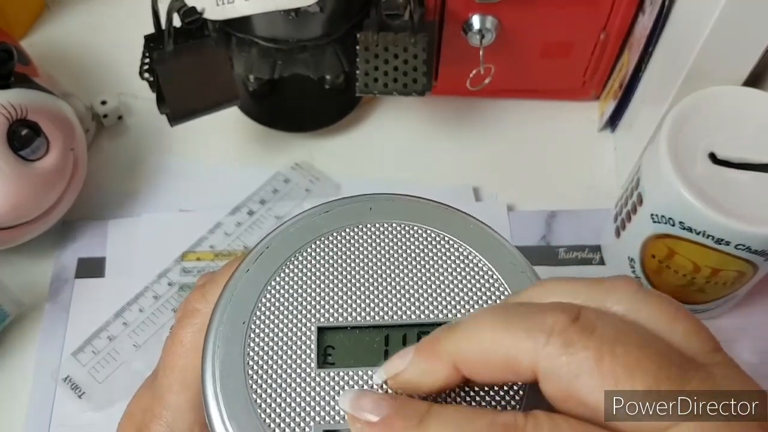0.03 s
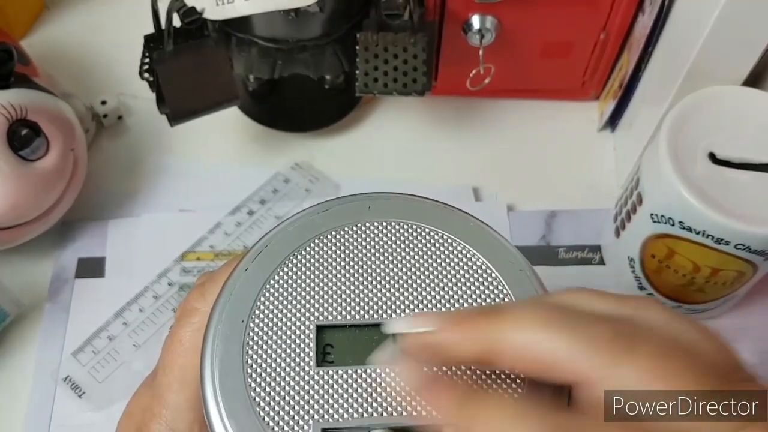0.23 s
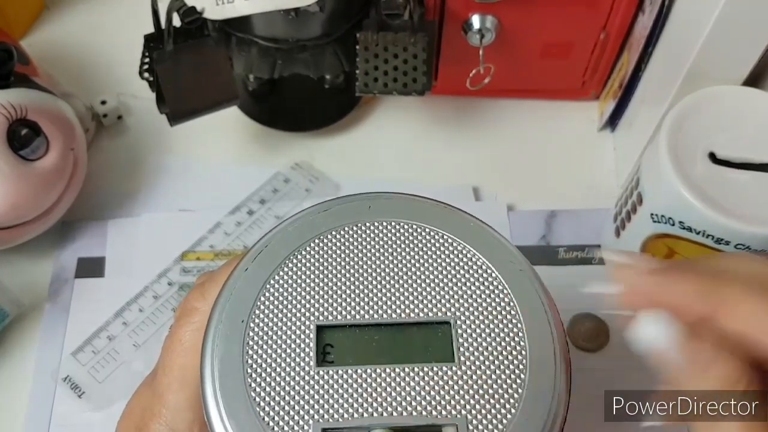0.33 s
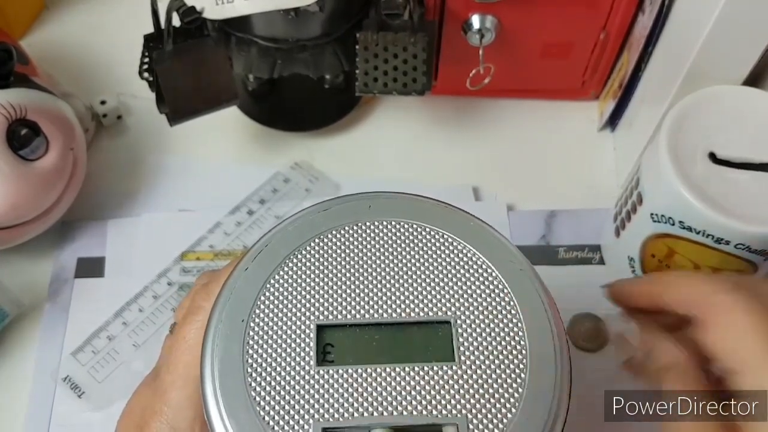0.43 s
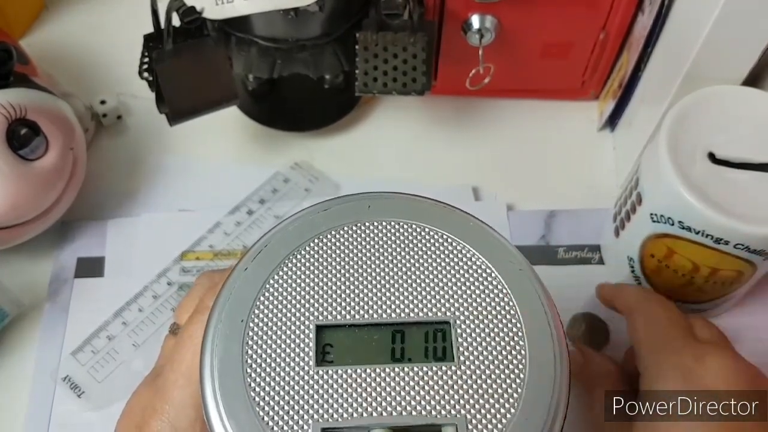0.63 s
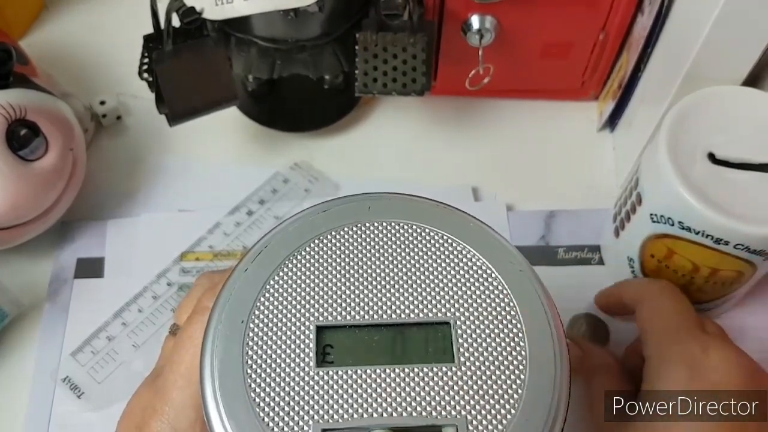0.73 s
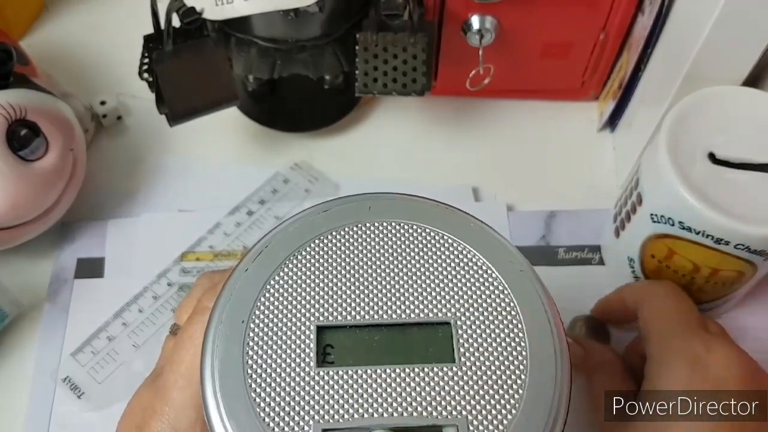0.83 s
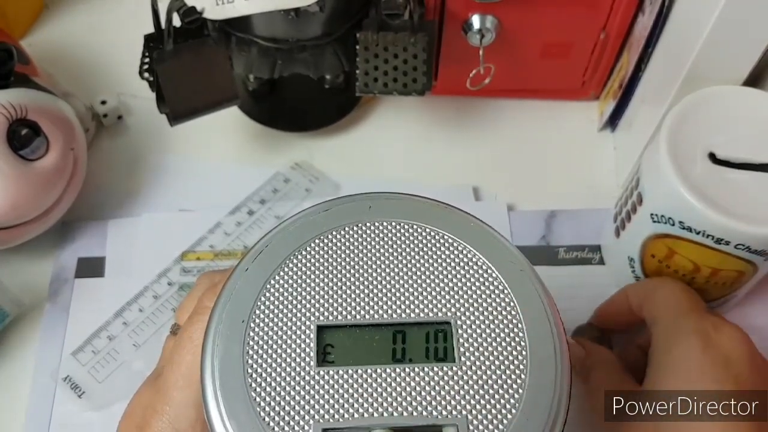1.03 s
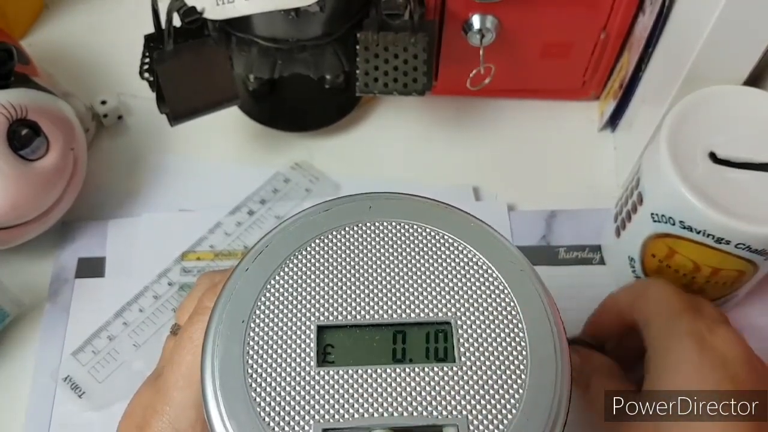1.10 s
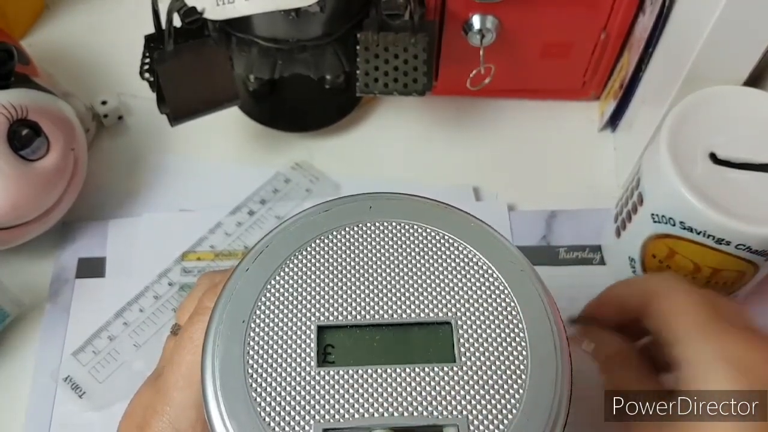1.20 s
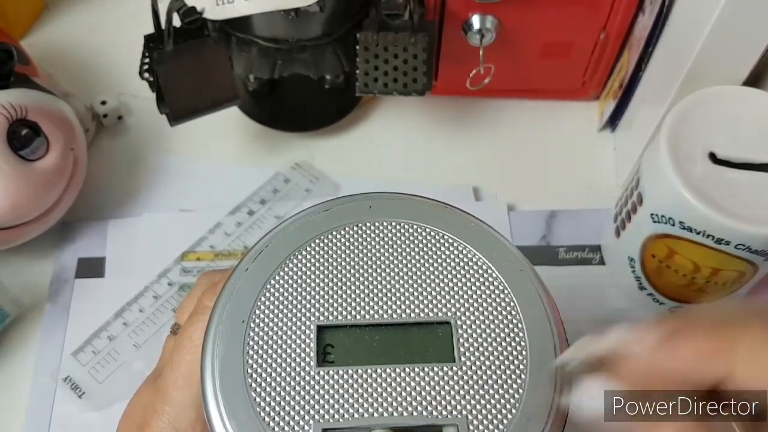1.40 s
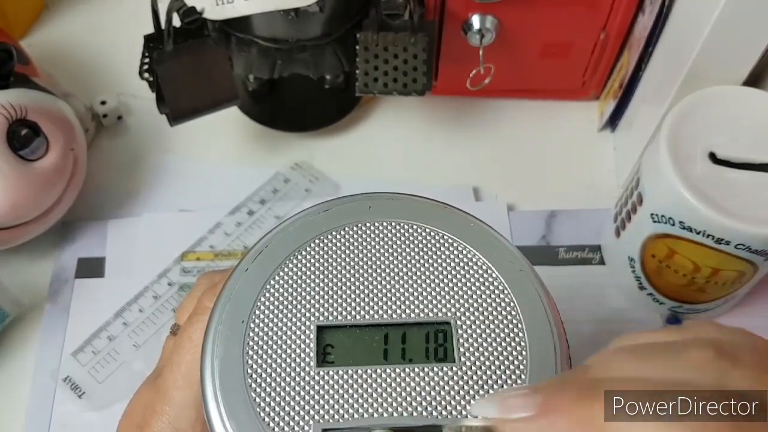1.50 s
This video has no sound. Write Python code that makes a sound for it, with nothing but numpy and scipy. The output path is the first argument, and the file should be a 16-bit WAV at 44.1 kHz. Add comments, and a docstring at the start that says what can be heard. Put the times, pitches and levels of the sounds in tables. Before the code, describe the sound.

A coin scrapes through a money tin's slot with a bright clack and lands with a thump, ringing faintly. A hand then slides another coin over paper with small ticks and bumps, close by in a quiet room.

```python
"""Coin into a money tin

A desk in a small quiet room, a stereo pair close by. A coin scrapes through the tin's sprung slot,
snaps through with a bright clack left of centre, lands with a thump and leaves a faint ring in the metal.
A hand then slides the next coin off the paper on the desk, with small ticks and soft bumps."""
import sys
import numpy as np
from scipy import signal
from scipy.fft import rfft, irfft
from scipy.io import wavfile
from scipy.ndimage import uniform_filter1d

SR = 44100
rng = np.random.default_rng(int(sys.argv[2]) if len(sys.argv) > 2 else 0)


def inscribe(sig):
    """Save sig as 16-bit PCM at rate SR to the path in sys.argv[1].

    A 1-D sig is mono; a 2-D sig holds one channel per row.
    Samples are clipped to [-1, 1] before scaling.
    """
    pcm = np.round(np.clip(np.atleast_2d(sig).T, -1, 1) * 32767)
    wavfile.write(sys.argv[1], SR, pcm.astype(np.int16))


N = 68355
T = np.arange(N) / SR
HZ = np.fft.rfftfreq(2 * N, 1 / SR)


def coin_clinks():
    """Each contact cracks and knocks the lid; the thin metal rings on. Returns (crack, knock, ring)."""
    # coin on slot and tin, fingers damping the ring: t/s, level/dB, tilt/(dB per octave), relative ring/dB
    contacts = [(0.014, -38, -1.5, -16), (0.0177, -35.5, -0.5, -12), (.0525, -42.5, -4, -8.5),
                (.1840, -37, -2.5, -15.5), (.1862, -37, -1.5, -14.5), (.2090, -22, -2, -14),
                (.2129, 3, -.8, 0), (.2168, -11.5, -3, -17), (.2285, -21.5, -2.5, -6),
                (0.2602, -21.5, 0, -25), (.3660, -39, -3, -5.5)]
    # spectrum of a contact: f/Hz, relative level/dB
    crack_shape = [(60, -28.5), (200, -9), (900, -7), (1300, -4), (2000, 11.5), (3000, -8), (4000, -3.5),
                   (7000, -9), (8800, -14.5), (11500, -11), (13000, -10.5), (15000, -10.5)]
    # quickly damped modes of the lid: f/Hz, and for each, relative level/dB, t60/s
    lid_hz = (700, 940, 1730, 2020, 3560, 4760, 5600, 6500, 7300, 11500, 14300)
    lid_decays = [(-24, 0.02), (-24, .05), (-20.5, 0.082), (-8.5, 0.015), (-18.5, 0.01), (-17, 0.021),
                  (-20.5, 0.014), (-20, .02), (-18, 0.017), (-22, .018), (-27.5, .014)]
    # ringing modes of the thin metal: f/Hz, and for each, relative level/dB, t60/s
    tin_hz = (380, 658.8, 812, 891, 956, 1726, 1797, 2070, 2170, 2260, 2480, 2645, 2961, 3208, 3569)
    tin_decays = [(-37, .1), (-42.3, 1.02), (-34, .11), (-34, .13), (-34, .13), (-28.5, .14), (-32, .14),
                  (-28, .15), (-35, .17), (-39, .25), (-29, .14), (-35, .16), (-60, .55), (-60, .85),
                  (-34, .13)]
    crack_db = -6.5
    mic_phase_rad = np.array([[.5], [-.5]])  # the two microphones meet each mode at a different phase
    lid = modes(lid_hz, lid_decays, mic_phase_rad)
    tin = modes(tin_hz, tin_decays, mic_phase_rad)
    crack, knock, ring = np.zeros((3, 2, N))
    for start, db, tilt, ring_db in contacts:
        snap = np.array([burst(crack_shape, t60=.024) for mic in range(2)])
        add(crack, start, amp(db + crack_db) * tilted(snap, tilt))
        add(knock, start, amp(db) * tilted(lid, tilt))
        add(ring, start, amp(db + ring_db) * tin)
    return crack, knock, ring


def slot_scrape():
    """Uneven slips in the slot come faster and grittier until the coin snaps through."""
    # the coin's way through the slot: t/s, slip level/dB, slip f/Hz
    travel = [(.191, -52.5, 300), (.194, -36.5, 332), (.199, -34.5, 354), (.203, -41, 682),
              (.208, -37, 900), (.213, -39, 1180)]
    jitter_rad, end_grit_db, grit_rise_db_per_s = .97, 12.5, 906.5
    times, db, hz = np.transpose(travel)
    cycles = np.cumsum(np.interp(T, times, hz)) / SR
    jitter = jitter_rad * np.interp(cycles, np.arange(N // 8), rng.standard_normal(N // 8))
    slips = np.sqrt(2) * np.cos(2 * np.pi * cycles + jitter)
    grit = friction_grit() * amp(end_grit_db - grit_rise_db_per_s * abs(times[-1] - T))
    in_slot = (T > times[0]) & (T < times[-1])
    return (slips + grit) * amp(np.interp(T, times, db)) * in_slot


def desk_bumps():
    """Soft pushes set the desk top booming; shorter ones knock higher."""
    # blows on the desk: t/s, level/dB, length/s
    blows = [(.001, -36, 0.0086), (0.026, -47, 0.0019), (0.181, -46, 0.0017), (0.2118, -32.5, 0.00067),
             (0.2598, -20, 0.0055), (.560, -62, 0.0048), (0.938, -46.5, 0.0043), (1.0440, -41, .003),
             (1.2274, -47, 0.003), (1.2440, -42, 0.0029), (1.249, -69, 0.0022), (1.2870, -37, 0.00096)]
    # modes of the desk top: f/Hz, and for each, relative level/dB, t60/s
    desk_hz = (86, 129, 139, 170, 250, 370)
    desk_decays = [(-11.5, .08), (3, .085), (-23, .5), (-11.5, 0.069), (0, 0.03), (-7, .04)]
    force = np.zeros(N)
    for start, db, length in blows:
        pulse = np.sin(np.pi * np.minimum(T / length, 1))
        add(force, start, amp(db) * pulse / pulse.sum())
    boom = signal.fftconvolve(force, modes(desk_hz, desk_decays))[:N]
    # the deepest bass is filtered out of the boom
    return signal.sosfilt(signal.butter(3, 70.6, "highpass", fs=SR, output="sos"), boom)


def desk_ticks():
    """Fingernail and loose coin click drily on the desk."""
    # light touches: t/s, level/dB, tilt/(dB per octave)
    touches = [(.144, -52, -2.5), (0.74, -57, -1), (0.777, -55, -3.5), (.791, -76, 6.5), (.8305, -51, -1.5),
               (.938, -53, -4), (1.0438, -45, -3), (.955, -55.5, -10.5), (1.065, -43.5, 0.5),
               (1.2125, -53, 2), (1.268, -51.5, -0.5), (1.2875, -52, -6)]
    # spectrum of a tick: f/Hz, relative level/dB
    tick_shape = [(100, -4), (700, 14.5), (2800, 3), (5000, -3), (9000, -9), (13000, -1), (16000, -1.5)]
    out = np.zeros((2, N))
    for start, db, tilt in touches:
        tick = np.array([burst(tick_shape, t60=.029) for mic in range(2)])
        add(out, start, amp(db) * tilted(tick, tilt))
    return out


def paper_slides():
    """Each slide swells and dies: a dull rumble of the desk with paper grit on top."""
    # hand and coin over paper: peak t/s, rise/s, fall/s, level/dB, relative grit/dB
    slides = [(0.013, 0.12, 0.048, -51, -1.5), (.481, .008, .022, -53, -26),
              (0.804, 0.027, 0.058, -71, 7.5), (0.947, 0.13, 0.042, -55.5, -8.5),
              (1.054, 0.041, 0.029, -64.5, -8), (1.25, .045, 0.029, -39.5, -24.5),
              (1.294, 0.0064, 0.05, -72, -19)]
    # rumble of the desk: f/Hz, relative level/dB
    rumble_shape = [(30, -36), (100, -11), (240, 0), (380, -2), (500, -20), (1000, -28), (3000, -50)]
    roughness_db = 3
    rumble = noise(rumble_shape)
    grain = amp(roughness_db * unit(uniform_filter1d(rng.standard_normal(N), size=90)))
    grit = unit(friction_grit() * grain)
    out = np.zeros((2, N))
    for peak, rise, fall, db, grit_db in slides:
        from_peak = np.maximum((peak - T) / rise, (T - peak) / fall)
        swell = amp(db - 20 * from_peak ** 1.09)
        out += swell * (rumble + amp(grit_db) * grit)
    return out


def friction_grit():
    """Hiss of rubbing surfaces, separate at each microphone."""
    # spectrum of the grit: f/Hz, relative level/dB
    grit_shape = [(100, -7), (500, 6.5), (1500, 2), (2500, 3), (4000, -14), (15000, -29)]
    return np.array([noise(grit_shape) for mic in range(2)])


def room_reflections(x):
    """Dense reflections off near walls, each band dying at its own speed."""
    # colour of the tail: f/Hz, level/dB
    tail_shape = [(100, -11), (400, -4.5), (800, -5), (1400, -4.5), (2000, -8), (3000, 2.5), (5000, -8.5),
                  (8000, -2), (15000, -6)]
    # decay of the room: f/Hz, t60/s
    decay_times = [(100, 0.12), (500, 0.37), (2000, .21), (5000, .22), (10000, 0.2173), (15000, .2)]
    delay_s, build_s = .0013, .004
    hz, t, bands = signal.stft(rng.standard_normal((2, N)), SR, nperseg=256)
    t60 = read(decay_times, hz)[:, None]
    equal_energy = np.sqrt(2 * np.log(1000) / (t60 * SR))
    tail = signal.istft(bands * fade(t60, t) * equal_energy, SR, nperseg=256)[1][:, :N]
    tail *= np.clip((T - delay_s) / build_s, 0, 1)
    return signal.fftconvolve(x, colour(tail, read(tail_shape)), axes=1)[:, :N]


def room_tone():
    """Steady room noise with a soft whirr on the left; the microphones share mostly the bass."""
    # background at each microphone: f/Hz, relative level/dB
    left_shape = [(20, -2), (60, -4), (130, 3.5), (250, -3), (500, -3), (850, -7.5), (1170, 9), (1500, 2),
                  (2100, -2), (3000, -16), (5000, -22), (9000, -26.5), (14000, -22)]
    right_shape = [(20, -5), (60, -0.5), (130, 7), (250, 0), (500, -4.5), (850, -10), (1170, -0.5),
                   (2100, -13), (3000, -14), (5000, -20), (9000, -25.5), (14000, -21)]
    # its rms: left level/dB, right level/dB
    levels = (-58.5, -64)
    # likeness across the pair: f/Hz, correlation/(0 to 1)
    likeness = [(30, .7), (130, 0.83), (500, 0.31), (1200, .3), (4000, 0.033)]
    left, separate = rng.standard_normal((2, N))
    shared = read(likeness)
    right = irfft(shared * rfft(left, 2 * N) + np.sqrt(1 - shared ** 2) * rfft(separate, 2 * N))[:N]
    return np.array([amp(levels[0]) * unit(colour(left, read(left_shape))),
                     amp(levels[1]) * unit(colour(right, read(right_shape)))])


def modes(pitches, decays, phase=0):
    """A struck body: dying sines, neighbours in opposite sign."""
    return sum((-1) ** k * amp(db) * fade(t60) * np.sin(2 * np.pi * hz * T + phase)
               for k, (hz, (db, t60)) in enumerate(zip(pitches, decays)))


def burst(shape, t60):
    """A short crack of noise, evened out in spectrum, then coloured."""
    spectrum = rfft(rng.standard_normal(N) * fade(t60))
    even = irfft(spectrum / (abs(spectrum) + 1e-12), N)
    crack = even * fade(2 * t60) * np.linalg.norm(fade(t60))
    db = read(shape)
    mean_db = 10 * np.log10(np.mean(amp(db) ** 2))
    return colour(crack, db - mean_db)


def noise(shape):
    """Noise of rms 1 with the given spectrum."""
    return unit(colour(rng.standard_normal(N), read(shape)))


def tilted(x, db_per_octave):
    """Brightens or dulls a blow around 2 kHz; the slope stops below 700 Hz."""
    return colour(x, db_per_octave * np.log2(np.maximum(HZ, 700) / 2000))


def colour(x, db):
    """Minimum-phase filter with the given gain at each frequency."""
    cepstrum = irfft(np.log(amp(db)))
    cepstrum[1:N] *= 2
    cepstrum[N + 1:] = 0
    return irfft(rfft(x, 2 * N) * np.exp(rfft(cepstrum)))[..., :N]


def read(points, hz=HZ):
    """Reads a table on a log-frequency axis."""
    f, value = np.transpose(points)
    return np.interp(np.log(hz + 1), np.log(f + 1), value)


def fade(t60, t=T):
    """Decay of 60 dB in t60 seconds."""
    return np.exp(-np.log(1000) * t / t60)


def amp(db):
    """Decibels to gain."""
    return 10 ** (np.asarray(db) / 20)


def unit(x):
    """Scales to rms 1."""
    return x / np.sqrt(np.mean(x ** 2) + 1e-20)


def add(mix, start_s, sound):
    """Mixes a sound in at a time."""
    part = mix[..., max(round(start_s * SR), 0):]
    part += sound[..., :part.shape[-1]]


def panned(x, left_db):
    """Places a sound between the microphones, left_db louder in the left one."""
    return x * amp([[left_db / 2], [-left_db / 2]])


def scene():
    """Tin, hand and desk as they reach the pair, with the room behind them."""
    lid_room_db = -4  # the lid beams at the microphones more than into the room
    crack, knock, ring = coin_clinks()
    handling = slot_scrape() + desk_ticks() + desk_bumps() + paper_slides()
    direct = panned(crack + knock, left_db=6.5) + panned(ring, left_db=-.5) + handling
    return direct + room_reflections(crack + amp(lid_room_db) * knock + handling) + room_tone()


def record(dry):
    """The microphone chain overloads softly on the loudest peak, then cuts the highest treble."""
    ceiling, edge_hz = .8, 15450
    limited = ceiling * np.tanh(dry / ceiling)
    lowpass = signal.firwin(255, edge_hz, window=("kaiser", 9), fs=SR)
    return signal.oaconvolve(limited, lowpass[None], "same")


dry = scene()
out = record(dry)
inscribe(out)
```